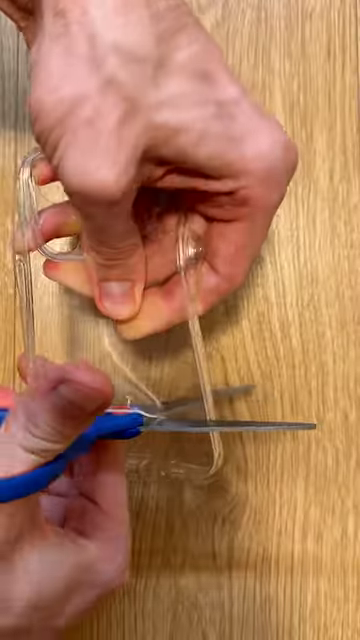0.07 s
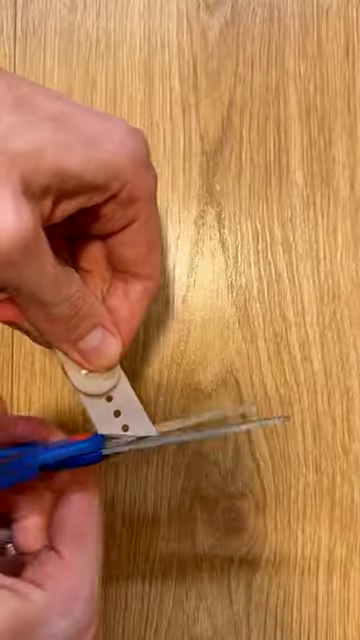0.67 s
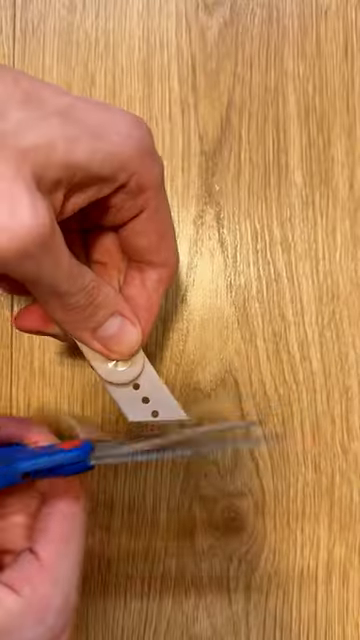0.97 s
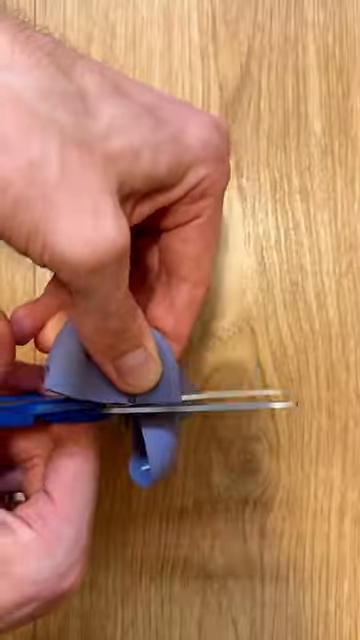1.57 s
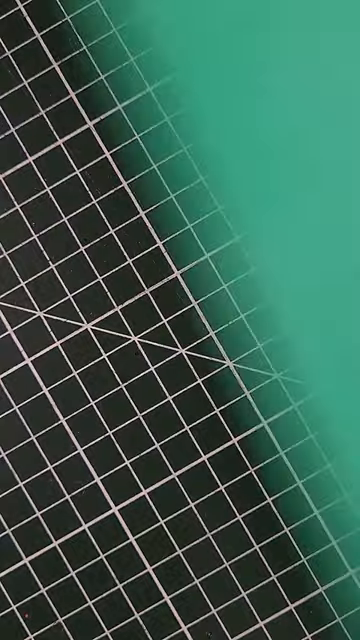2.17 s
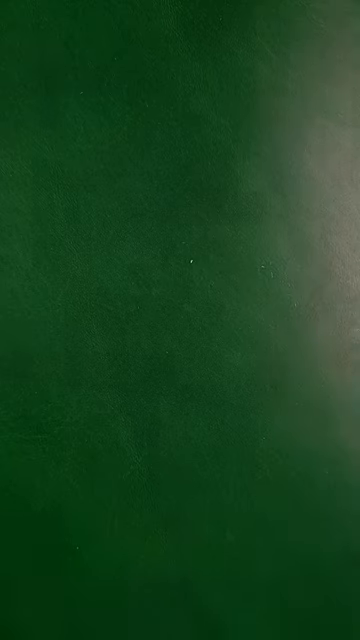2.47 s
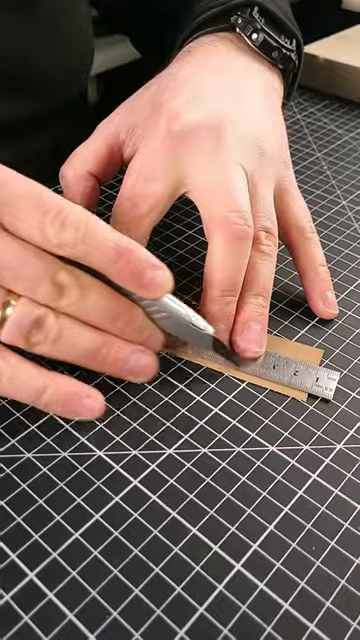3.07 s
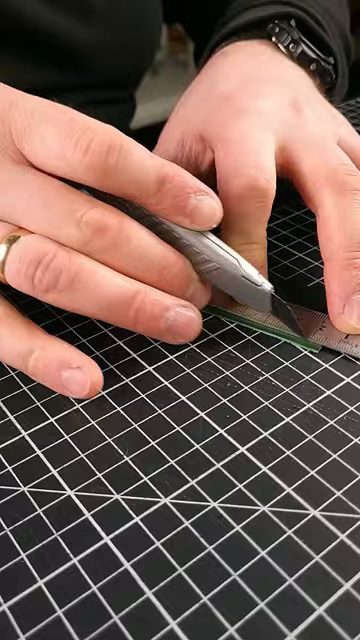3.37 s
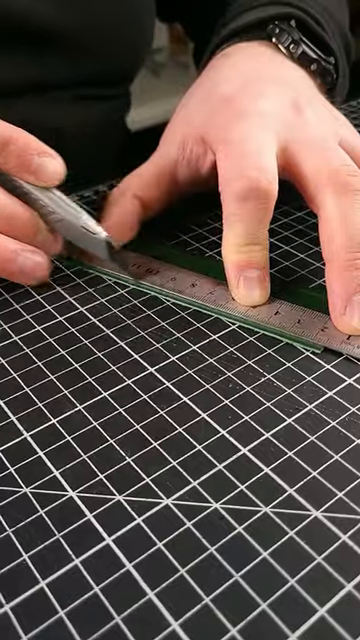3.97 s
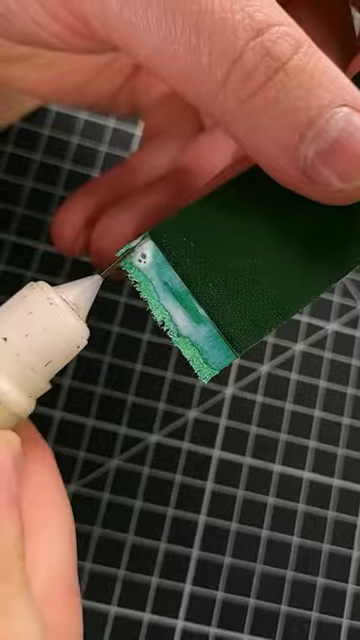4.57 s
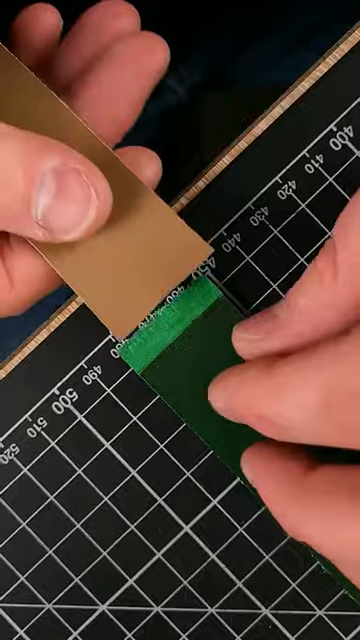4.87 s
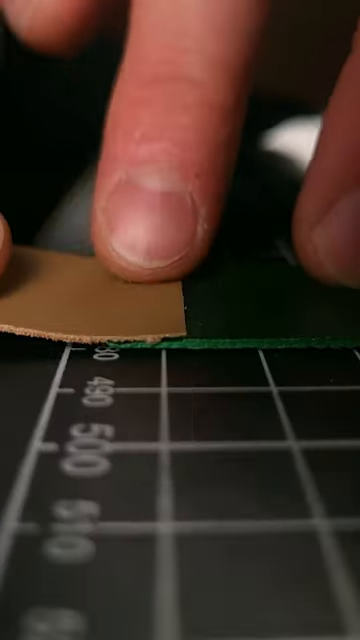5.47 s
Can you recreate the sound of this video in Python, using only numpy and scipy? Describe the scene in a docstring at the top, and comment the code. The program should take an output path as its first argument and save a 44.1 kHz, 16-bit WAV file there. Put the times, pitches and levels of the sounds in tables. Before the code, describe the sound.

A sharp crack of scissors through plastic starts a run of irregular snips, crunches and metallic ticks, heard close in a small workshop. Then comes the loudest sound, a cutting mat slapping a table, followed by lighter slaps and swishes of leather sheets. Two quieter knife strokes scrape along a steel ruler through leather, the first bright and even, the second rougher. Faint room hum and a tiny fingertip tap close it.

```python
"""Craft work heard close up. First, scissors crack through a plastic case, crunch a rubber strap and
snip a soft strip: each fracture rings the blades and jolts the handles. At 2 s a cutting mat slaps
the table, squeezing out the air beneath it, and leather sheets slide onto it. From 2.9 s a knife is
drawn twice along a steel ruler, and the parting leather fibres excite the modes of the steel.
Then only the workshop hums, with one light touch of the leather."""
import sys
import numpy as np
from scipy import signal
from scipy.fft import rfft, irfft, next_fast_len
from scipy.io import wavfile
from scipy.ndimage import uniform_filter1d, map_coordinates

SR = 44100
rng = np.random.default_rng(int(sys.argv[2]) if len(sys.argv) > 2 else 0)


def waveform_to_disk(signal):
    """Save audio, clipped to [-1, 1], as 16-bit WAV at the path in sys.argv[1]."""
    frames = np.transpose(np.atleast_2d(signal))
    scaled = np.clip(frames, -1, 1) * 32767
    samples = np.round(scaled).astype(np.int16)
    wavfile.write(sys.argv[1], SR, samples)


N = 243873
T = np.arange(N) / SR

# Levels are relative, ahead of filtering and mixing; a slope is the fall either side of a centre.
# background spectra of desk, table and workshop: (frequency [Hz], level [dB])
DESK_AIR = [(25, -13.5), (92, -9.5), (166, -22.5), (309, -27.5), (700, -37), (1500, -29.5), (2300, -26),
            (3200, -34), (4400, -26.5), (5600, -38), (7000, -32.5), (10000, -52), (16000, -61)]
TABLE_AIR = [(15, -32), (25, 7.5), (217, 1.5), (309, -5.5), (516, -9), (695, 0), (775, -4), (962, -4.5),
             (1610, -23.5), (2910, -28), (5000, -32.5), (16000, -43)]
SHOP_AIR = [(25, -7), (55, -9), (87, -16), (123, -11), (165, -16), (235, -5), (370, -8), (460, -5),
            (520, -11), (710, -3.5), (950, -12), (1120, -19), (1400, -18), (1700, -24), (2700, -28),
            (3200, -28), (4500, -37), (8000, -41), (14500, -44), (16000, -60)]
# mains hum: (frequency [Hz], level [dB])
MAINS_HUM = [(118.4, -68), (236.9, -72.5), (468.3, -74), (710.6, -69.5)]
# faint electric whines: (start [s], end [s], centre [Hz], level [dB], width [Hz])
WHINES = [(4.24, 4.75, 2317, -93, 90), (4.242, 5.2, 6830, -91, 240.3), (4.799, 5.6, 3226, -84.5, 90)]
# the workshop's level dips briefly: (time [s])
SHOP_DIPS = [4.786, 5.463]
# the hands lean on the desk: (start [s], end [s], level [dB])
LEANS = [(0.418, 0.585, -62), (0.832, 0.992, -63), (1.25, 1.456, -54.5), (1.575, 1.697, -69),
         (1.784, 2.03, -61)]
# spectrum of the desk's rumble: (frequency [Hz], level [dB])
RUMBLE_TONE = [(25, -20.5), (70, 6.0), (130, -4.5), (250, -12.5), (500, -50)]
# reverberation time: (frequency [Hz], t60 [s])
ROOM_DECAY = [(150, 0.13), (500, 0.18), (2000, 0.25), (10000, 0.1)]
# fingertip on leather: (time [s], rise [s], t60 [s], level [dB], centre [Hz], slope [dB/octave])
TOUCH = [(5.171, 0.0011, 0.019, -61, 8800, 24), (5.171, 0.0011, 0.018, -63, 2200, 8),
         (5.176, 0.012, 0.15, -70, 1910, 9)]

# resonances of desk, scissors, table, and knife with ruler: (frequency [Hz], width [Hz], level [dB])
DESK_MODES = [(245.6, 130, 4.5), (522.5, 46, -3.5), (1040, 80, 5.5)]
SCISSOR_MODES = [(1290, 180, -7), (1950, 260, 1), (2670, 220, -1), (4404, 180, -0.5), (6100, 300, -4),
                 (6950, 810, -1.5)]
TABLE_MODES = [(116, 30, -4.5), (157, 30, -12), (305, 90, -1), (438, 19, -2.5), (820, 130, -6.5),
               (1330, 81, -9), (2680, 480, -9.5), (4450, 280, -8.5)]
FIRST_MODES = [(954, 37, 14), (1655, 120, 8), (2530, 320, 0), (3460, 670, 6), (7000, 1160, 6.5),
               (9200, 900, -4), (13100, 700, -1)]
SECOND_MODES = [(318, 50, -2), (1410, 135, 6), (1880, 110, -1), (2370, 160, 3.5), (2800, 200, 1),
                (3790, 250, 4), (4410, 200, 4), (7760, 360, 4), (10100, 370, -2), (12800, 550, 0)]
# spectral envelopes of scissors, sheets and the two knife strokes: (frequency [Hz], level [dB])
SCISSOR_TONE = [(200, 6), (1000, 2.5), (3000, -5.5), (5000, -5), (8000, -4.5), (10000, -1), (12000, -7.5),
                (14500, 3.5), (16000, 0.5)]
SHEET_TONE = [(100, 1.5), (520, 0), (640, -2.5), (780, -1), (5000, -2.5), (10000, -1.5), (16000, -6.5)]
FIRST_TONE = [(59, -40), (100, -12.5), (283, -0.5), (381, -6.5), (560, 3.5), (800, -3.5), (930, -3),
              (1100, -2), (1390, -16.5), (1700, -13.5), (2420, -10.5), (4200, -13.5), (7140, -14.5),
              (15000, -17.5), (16000, -26)]
SECOND_TONE = [(59, -35), (100, 14), (124, 9), (147, -17), (181, -4.5), (350, -3), (700, -2), (950, -9),
               (1420, -12.5), (2700, -15.5), (3100, -19.5), (3650, -15.5), (4470, -17), (6020, -25.5),
               (7940, -19), (16000, -26.5)]

# the scissors sound in three spans, each stopping short: (start [s], end [s])
SCISSOR_CUTS = [(0, .622), (.79, 1.507), (1.52, 2.03)]
# the material gives way and the handles jolt: (time [s], level [dB], pitch [Hz])
JOLTS = [(.3857, -24.5, 920), (0.3879, -11.5, 517), (.560, -28, 442), (.563, -31.5, 252),
         (0.855, -29.5, 540), (0.9528, -29.5, 620), (1.008, -31.5, 620), (1.0409, -43.5, 600),
         (1.0604, -44, 570), (1.272, -43, 570), (1.3638, -21, 500), (1.4197, -27, 537), (1.464, -38, 487),
         (1.798, -44, 448), (1.851, -43.5, 445), (1.904, -44.5, 520)]
# dry ticks of the blades: (time [s], level [dB], pitch [Hz], bright edge [dB])
TICKS = [(0.1707, -37.5, 1410, -43.5), (0.607, -37.5, 1590, -38), (1.11, -32, 1640, -23),
         (1.2233, -29, 1390, -38), (1.418, -38.5, 1400, -48), (1.7575, -25, 2120, -23.5),
         (1.8117, -38, 2320, -36.5), (1.8491, -35, 2840, -34), (1.904, -51, 2320, -34),
         (1.9837, -54.5, 2700, -43), (2.01, -55, 2430, -50)]
# the material cracks: (time [s], level [dB], centre [Hz], slope [dB/octave])
CRACKS = [(0.374, -26.5, 6400, 6), (0.3765, -16, 7560, 17), (.381, -28.5, 8100, 10),
          (0.384, -27.5, 3150, 16), (0.5549, -30.5, 4570, 4), (0.607, -43, 2700, 11.5),
          (0.6122, -45, 2880, 10), (0.797, -43, 2510, 0.5), (0.852, -47.5, 1850, 27),
          (.865, -52.5, 2000, 14), (.957, -45.5, 2400, 21), (.968, -51, 2500, 17), (1.035, -59, 6500, 7.5),
          (1.222, -43, 10000, 5), (1.233, -39, 7000, -0.5), (1.2358, -34, 5900, 8),
          (1.2379, -34.5, 2800, 21.5), (1.416, -52, 1600, 6), (1.461, -45, 2300, 8.5),
          (1.757, -32, 3050, 11), (1.763, -39, 2350, 28), (1.808, -47, 2400, 25), (1.849, -43, 3970, 35),
          (1.874, -47, 2800, 11), (1.9, -47, 2580, 5)]
# the blades slide along each other: (time [s], t60 [s], level [dB], hiss [dB])
GRINDS = [(0.199, 0.17, -64, -64), (0.328, 0.22, -75, -66.5), (0.491, 0.46, -52, -56),
          (0.835, 0.15, -56, -64), (0.944, 0.18, -51, -51), (1.268, 0.082, -54, -58),
          (1.344, 0.33, -55, -56), (1.766, 0.31, -57.5, -69.5), (1.875, 0.25, -54.5, -65),
          (1.926, 0.25, -62.5, -75)]
# phase difference between two microphone ports at the desk: (frequency [Hz], phase [rad])
PORT_PHASE = [(200, 0), (800, 0.64), (2500, -1), (4500, -1.5), (7000, -0.96), (11000, -3), (14000, -3.5)]

# mat and sheets land: (time [s], clap [dB], clap pitch [Hz], clap width [cycles],
# air [dB], air centre [Hz], air t60 [s], smack [dB])
LANDINGS = [(2.0358, -16.5, 606, 0.95, -23.5, 1000, 0.094, -33.5),
            (2.0676, -7, 421.4, 1.25, -20, 1900, 0.043, -23.5), (2.131, -17, 798, 2, -23, 1100, .07, -33),
            (2.2863, -17, 800, 1.4, -20, 850, 0.051, -37),
            (2.5822, -21, 870, 2.25, -37.5, 1000, 0.077, -47.5)]
# a stiff edge whips the table: (time [s], level [dB], pitch [Hz], width [cycles])
EDGE_SNAPS = [(2.067, -4.5, 2302, 0.4), (2.1307, -12, 1902, 0.3), (2.1365, -14.5, 1700, 0.24),
              (2.2817, -2.5, 2200, 0.3)]
# the body of the sheet follows and bounces: (time [s], level [dB], pitch [Hz])
THUDS = [(2.0432, -27, 200.2), (2.0723, -3.5, 217), (2.0865, -10, 290), (2.1025, -19, 170),
         (2.115, -18, 461), (2.1378, -20, 130), (2.189, -27, 260), (2.2932, -18, 180.8),
         (2.3338, -27, 188.6), (2.5889, -29.5, 188)]
# the sheets slide: (time [s], rise [s], t60 [s], level [dB], centre [Hz])
SLIDES = [(2.07, 0.0083, 0.21, -23.5, 600), (2.112, 0.012, 0.36, -22, 804), (2.135, 0.025, 0.4, -30, 220),
          (2.215, 0.055, 0.092, -28, 1200), (2.319, 0.011, 0.26, -31.5, 550),
          (2.357, 0.024, 0.022, -42.5, 2900), (2.585, 0.021, 0.31, -40.5, 2350)]
# the smooth face of the leather hisses past: (time [s], t60 [s], level [dB], centre [Hz])
SWISHES = [(2.061, 0.12, -38.5, 5500), (2.125, 0.21, -38.5, 6990), (2.231, 0.093, -36.5, 10800),
           (2.337, 0.04, -44.5, 4490)]
# light pats on the leather: (time [s], level [dB], centre [Hz])
PATS = [(2.331, -41, 1900), (2.348, -43.5, 3000), (2.473, -41.5, 1167), (2.544, -40.5, 1396),
        (2.634, -37, 840), (2.669, -48, 1110), (2.714, -48.5, 1006)]
# the air gap under the falling sheet narrows: (time [s], resonance [Hz], lift [dB])
SHEET_GAP = [(2.03, 1290, 5.5), (2.28, 1370, 1.5), (2.39, 3280, 10), (2.7, 2500, -3)]
# stereo spread of the sheets: (frequency [Hz], side level [dB])
SHEET_WIDTH = [(60, -14), (250, -30.5), (1000, -19), (2000, -18), (5000, -25), (11000, -30.5)]

# first knife stroke: (time [s], drag on the mat [dB], ruler ring [dB], rasp [dB], hiss [dB])
FIRST_LEVELS = [(2.9, -50, -48, -45, -45.5), (2.908, -42.5, -43.5, -46, -43.5),
                (2.94, -47, -43, -44, -44.5), (2.958, -45, -45, -46.5, -46),
                (2.994, -44.5, -54, -46.5, -45.5), (3.046, -48, -41.5, -46.5, -44),
                (3.07, -48.5, -44.5, -51, -44), (3.13, -54.5, -44.5, -53.5, -44.5),
                (3.17, -47.5, -47, -50, -43.5), (3.218, -52, -51, -52, -48), (3.254, -56, -48, -46, -42),
                (3.282, -49.5, -44.5, -46, -45), (3.365, -51, -44.5, -46, -45.5)]
# second knife stroke: (time [s], drag on the mat [dB], rasp [dB], blade ring [dB], hiss [dB])
SECOND_LEVELS = [(3.39, -64, -51, -56, -52.5), (3.42, -56, -49.5, -57.5, -55), (3.48, -56, -55, -57, -54),
                 (3.492, -57, -51, -56, -55), (3.504, -62, -48.5, -57, -55.5), (3.55, -53, -45, -49, -53.5),
                 (3.58, -59, -48, -53.5, -57), (3.67, -57, -40.5, -44.5, -55),
                 (3.742, -53, -43.5, -58.5, -50), (3.768, -58, -38, -47.5, -48.5),
                 (3.876, -53, -39.5, -41, -53.5), (3.914, -55, -41, -50, -54.5),
                 (3.936, -51, -47, -47, -55), (3.95, -51.5, -44, -49, -45), (3.976, -50, -52.5, -46.5, -50),
                 (4.11, -44, -56.5, -50, -55), (4.154, -49.5, -57.5, -54.5, -56.5),
                 (4.23, -49, -60, -54, -59.5)]
# the hollow under the travelling knife hand: (time [s], resonance [Hz], lift [dB])
FIRST_HOLLOW = [(2.9, 1750, 9), (3.05, 2140, 3), (3.16, 3120, 5), (3.37, 2520, 3.5)]
SECOND_HOLLOW = [(3.39, 880, 16), (3.53, 950, 9), (3.7, 1390, 8.7), (3.8, 1760, 12), (3.9, 2080, 6.3),
                 (4.24, 2980, 1.44)]
# the edge catches on tough fibres: (time [s], level [dB], centre [Hz], t60 [s], slope [dB/octave])
CATCHES = [(2.9085, -37, 3000, 0.0093, 9), (2.97, -32.5, 13050, .012, 22), (3.073, -35, 6840, 0.02, 45),
           (3.2446, -36, 3020, 0.013, 14), (3.256, -34, 3200, 0.012, 16), (3.4234, -47, 3850, 0.024, 62),
           (3.4904, -38.5, 4020, 0.026, 58), (3.674, -43, 3850, 0.031, 60), (3.7, -40.5, 3850, 0.031, 55)]


def amp(db):
    """Amplitude ratio of a level in decibels."""
    return 10 ** (np.asarray(db) / 20)


def unit(x):
    """Normalisation to rms 1."""
    return x / np.sqrt(np.mean(x ** 2) + 1e-20)


def along(points, hz):
    """Interpolation on a logarithmic frequency axis."""
    f, v = np.transpose(points)
    return np.interp(np.log(hz + 1), np.log(f + 1), v)


def envelopes(rows):
    """Amplitude envelopes, one for each level column."""
    times, *levels = np.transpose(rows)
    return [amp(np.interp(T, times, db)) for db in levels]


def during(start, end, fade):
    """A time window that fades in and stops short."""
    return np.clip((T - start) / fade, 0, 1) * np.clip((end - T) / 0.0026, 0, 1)


def filtered(x, response):
    """Linear filtering: the spectrum times a frequency response."""
    n = x.shape[-1]
    m = next_fast_len(n + 8192)
    return irfft(rfft(x, m) * response(np.fft.rfftfreq(m, 1 / SR)), m)[..., :n]


def highpass(f, hz):
    """Magnitude response of a third-order high-pass."""
    return 1 / np.sqrt(1 + (hz / (f + 1)) ** 6)


def ringing(modes, f):
    """Modal response: direct sound plus damped resonators."""
    return 1 + sum(amp(db) * 1j * f * w / (c * c - f * f + 1j * f * w) for c, w, db in modes)


def add(track, s, sound):
    """Superposition of a sound on a track from time s."""
    part = track[max(round(s * SR), 0):][:len(sound)]
    part += sound[:len(part)]


def stereo(mid, side):
    """Sum and difference give left and right."""
    return np.array([mid + side, mid - side])


def flutter(rate, depth_db):
    """Random amplitude modulation, with rate new values a second."""
    knots = rng.standard_normal(int(N * rate / SR) + 4)
    return unit(amp(depth_db * map_coordinates(knots, [T * rate])))


def grit(n, density, spread_db):
    """Friction as shot noise: tiny slips of unequal size, density a second."""
    slips = rng.random(n) < density / SR
    return unit(slips * rng.standard_normal(n) * amp(spread_db * np.clip(rng.standard_normal(n), -2, 2)))


def impacts(rows, droop):
    """Heavily damped oscillations whose pitch sags as the contact relaxes."""
    out, t = np.zeros(N), np.arange(-SR // 20, SR // 20) / SR
    for s, db, hz, cycles in rows:
        u = np.clip(t * hz / cycles, -4, 4)  # time in pulse widths
        add(out, s + t[0], amp(db) * np.exp(-u ** 2) * np.cos(2 * np.pi * cycles * (u - droop * u ** 2)))
    return out


def bursts(rows, density, spread_db, modes=()):
    """Shot noise with one broad spectral peak, a linear rise and an exponential decay."""
    out, t = np.zeros(N), np.arange(SR // 2) / SR
    for s, rise, t60, db, hz, slope in rows:
        colour = lambda f: amp(-slope * np.hypot(np.log2((f + 1) / hz), .3))
        swell = np.minimum(t / rise, 1) * amp(-60 * np.maximum(t - rise, 0) / t60)
        burst = amp(db) * swell * unit(filtered(grit(len(t), density, spread_db), colour))
        if modes:  # the ring shifts with the point where the blades touch
            shifted = [(c * 2 ** (0.099 * rng.standard_normal()), w, level) for c, w, level in modes]
            burst = filtered(burst, lambda f: ringing(shifted, f))
        add(out, s, burst)
    return out


def room(x, delay):
    """Reverberation: a diffuse tail in which each frequency decays at its own rate."""
    hz, t, z = signal.stft(rng.standard_normal(SR // 2), SR, nperseg=256)
    tail = signal.istft(z * amp(-60 * t / along(ROOM_DECAY, hz)[:, None]), SR, nperseg=256)[1]
    return signal.fftconvolve(x, np.pad(tail / np.linalg.norm(tail), (round(delay * SR), 0)))[:N]


def cavity(x, hollow, octaves, ripple_db):
    """A gliding cavity resonance, rippled by reflections off the moving hands; loudness is kept."""
    hz, t, z = signal.stft(x, SR, nperseg=512)
    s, centre, lift = np.transpose(hollow)
    detuning = np.log2((hz[:, None] + 1) / np.interp(t, s, centre)) / octaves
    ripples = uniform_filter1d(rng.standard_normal(z.shape), size=3, axis=0)
    ripples = unit(uniform_filter1d(ripples, size=28, axis=1))
    gain = amp(np.interp(t, s, lift) * np.exp(-detuning ** 2) + ripple_db * ripples)
    power = np.mean(np.abs(z) ** 2, axis=1)
    return signal.istft(z * gain / np.sqrt(power @ gain ** 2 / power.sum()), SR, nperseg=512)[1][:N]


def air(spectrum, side_db):
    """Coloured noise, partly correlated between the ears."""
    mid, side = filtered(rng.standard_normal((2, N)), lambda hz: amp(along(spectrum, hz)))
    return stereo(unit(mid), amp(side_db) * unit(side))


def hum(hz, db):
    """One partial of the mains hum: a sinusoid of wavering amplitude."""
    partial = amp(db) * np.sqrt(2) * np.sin(2 * np.pi * (hz * T + rng.random()))
    return partial * flutter(rate=11, depth_db=2.5)


def whine(hz, db, width_hz):
    """Narrow-band noise, heard as a fuzzy pitch."""
    return amp(db) * unit(filtered(rng.standard_normal(N), lambda f: np.exp(-((f - hz) / width_hz) ** 2)))


def desk_rumble():
    """Structure-borne noise that swells while the hands lean on the desk."""
    rest_db, fade_s = -76, 0.053
    lean = sum(amp(db) * np.exp(-((T - np.clip(T, start, end)) / fade_s) ** 2) for start, end, db in LEANS)
    return (amp(rest_db) + lean) * air(RUMBLE_TONE, side_db=-18.5)


def background():
    """The noise floor of desk, table and humming workshop in turn."""
    desk = (amp(-73) * air(DESK_AIR, side_db=-6.5) + desk_rumble()) * during(-.01, 2.03, fade=.005)
    table = amp(-43.5) * air(TABLE_AIR, side_db=-26.5) * during(2.03, 2.884, fade=0.0092)
    shop = amp(-61.5) * air(SHOP_AIR, side_db=-22) + sum(hum(hz, db - 1.5) for hz, db in MAINS_HUM)
    for start, end, hz, db, width in WHINES:
        shop += whine(hz, db, width) * during(start, end, fade=0.0071)
    dips = amp(-11 * sum(np.exp(-((T - s) / 0.0093) ** 2) for s in SHOP_DIPS))
    return desk + table + shop * dips * during(2.6, 5.6, fade=.01)


def touch():
    """Light contact: a fingertip sets the leather down with a click and a rustle."""
    return bursts(TOUCH, density=11000, spread_db=10)


def handle_jolts():
    """Sudden unloading: as the material parts, the handles thud and rebound into desk and room."""
    thuds, tails = np.zeros(N), np.zeros(N)
    for s, db, hz in JOLTS:
        rebound = (s + .004, db - 14, hz * 0.58, 1)
        jolt = impacts([(s, db, hz, 1), rebound], droop=0.17)
        thuds += jolt
        tails += room(jolt, delay=0.0062)
    return thuds + amp(-10) * filtered(tails, lambda f: ringing(DESK_MODES, f))


def blade_ticks():
    """Impact of steel on steel excites the modes of the scissors."""
    blows = []
    for s, db, hz, edge_db in TICKS:
        blows += [(s, db, hz, 0.65),  # dry body
                  (s, edge_db, 7000, 0.29),  # bright edge
                  (s, edge_db - 10.5, 3920, 5.1)]  # brief ring
    ticks = impacts(blows, droop=0.15)
    return amp(-2.5) * filtered(ticks, lambda f: ringing(SCISSOR_MODES, f) * highpass(f, 210))


def blade_crunch():
    """Fracture of the material and sliding friction of the blades ring the steel."""
    crack_rise_s, crack_t60_s = 0.0015, 0.018
    cracks, grinds, hisses, crumbs = [], [], [], []
    for s, db, hz, slope in CRACKS:
        cracks.append((s, crack_rise_s, crack_t60_s, db, hz, slope))
        cracks.append((s, crack_rise_s, crack_t60_s, db - 7.5, 14050, 16))  # finest splinters
        grinds.append((s, .006, 0.18, db - 23, 3010, 2.5))  # the blades grind on
    for s, t60, db, hiss_db in GRINDS:
        rise = 0.047 * t60
        grinds.append((s, rise, t60, db, 2004, 3))
        hisses.append((s, rise, t60, hiss_db, 8320, 14))  # the honed edges slip
        crumbs.append((s, rise, t60, db - 4.5, 2212, 16))  # the material crumbles in grains
    crunch = bursts(cracks, density=7500, spread_db=1, modes=SCISSOR_MODES)
    crunch += bursts(crumbs, density=190, spread_db=4, modes=SCISSOR_MODES)
    grinding = bursts(grinds, density=2500, spread_db=1, modes=SCISSOR_MODES)
    crunch += amp(-1) * grinding * flutter(rate=250, depth_db=2.5)
    crunch += bursts(hisses, density=700, spread_db=2.5)
    return filtered(crunch, lambda f: amp(along(SCISSOR_TONE, f)) * highpass(f, 520))


def scissors():
    """A near source: blades and handles reach the two channels with a phase difference."""
    thuds, crunch = handle_jolts(), blade_crunch()
    mid = crunch + blade_ticks() + amp(-12) * room(crunch, delay=0.0029)
    pair = stereo(mid, amp(-14) * room(crunch, delay=0.0018)) + thuds * amp([[.7], [-.7]])
    pair *= sum(during(start, end, fade=0.011) for start, end in SCISSOR_CUTS)
    sides = np.array([[1], [-1]])
    return filtered(pair, lambda f: highpass(f, 130) * np.exp(.5j * along(PORT_PHASE, f) * sides))


def landings():
    """Impact and air displacement of the falling mat and sheets; returns (blows, puffs)."""
    blows = EDGE_SNAPS + [(s, db, hz, .6) for s, db, hz in THUDS]
    puffs = []
    for s, clap_db, clap_hz, cycles, air_db, air_hz, air_t60, smack_db in LANDINGS:
        blows.append((s, clap_db, clap_hz, cycles))
        puffs.append((s - .005, .005, air_t60, air_db, air_hz, 9))  # air escapes just before contact
        puffs.append((s - .003, .003, 0.019, smack_db, 6000, 7))  # bright smack
    return impacts(blows, droop=0.12), bursts(puffs, density=10000, spread_db=-0.5)


def sheets():
    """Forced vibration of the table as mat and leather slap, slide and settle."""
    slaps, puffs = landings()
    rubs = [(s, rise, t60, db, hz, 9) for s, rise, t60, db, hz in SLIDES]
    rubs += [(s, 0.037, t60, db, hz, 14) for s, t60, db, hz in SWISHES]
    rubs += [(s, 0.0029, 0.078, db, hz, 7) for s, db, hz in PATS]
    friction = bursts(rubs, density=10000, spread_db=1.5)
    slides = cavity(puffs + friction, SHEET_GAP, octaves=0.47, ripple_db=2.5)
    table = filtered(slaps + slides, lambda f: ringing(TABLE_MODES, f) * amp(along(SHEET_TONE, f)))
    side = filtered(room(table, delay=.001), lambda f: amp(along(SHEET_WIDTH, f)))
    return stereo(table + amp(-14) * room(table, delay=.004), side)


def fibre_snaps():
    """Fracture transients: tough fibres snap under the knife."""
    snaps = [(s, .0006, t60, db, hz, slope) for s, db, hz, t60, slope in CATCHES]
    return bursts(snaps, density=20000, spread_db=1)


def scrape(tone, modes, lo_hz, hi_hz, density, spread_db):
    """Source and filter: parting fibres excite blade and ruler; one band of that, at rms 1."""
    band = lambda f: 1 / np.sqrt((1 + (lo_hz / (f + 1)) ** 8) * (1 + (f / hi_hz) ** 8))
    fibres = grit(N, density, spread_db)
    return unit(filtered(fibres, lambda f: amp(along(tone, f)) * ringing(modes, f) * band(f)))


def first_stroke():
    """Steady friction: a bright, even cut through thin leather; the ruler rings under the blade."""
    drag_gain, ring_gain, rasp_gain, hiss_gain = envelopes(FIRST_LEVELS)
    steel = FIRST_TONE, FIRST_MODES
    rasp = rasp_gain * scrape(*steel, 1430, 4400, density=3500, spread_db=2)
    hiss = hiss_gain * scrape(*steel, 5100, 18000, density=11000, spread_db=1)
    cut = amp(0.5) * cavity(rasp + hiss, FIRST_HOLLOW, octaves=0.28, ripple_db=3)
    cut += amp(1) * ring_gain * scrape(*steel, 910, 1200, density=5000, spread_db=0.5)
    cut += drag_gain * scrape(*steel, 140, 750, density=3000, spread_db=1)
    cut *= during(2.885, 3.372, fade=0.017)
    return stereo(cut, amp(-30) * room(cut, delay=.001))


def second_stroke():
    """Stick-slip friction: a longer cut under a rising resonance; the tip ends dragging on the mat."""
    drag_gain, rasp_gain, ring_gain, hiss_gain = envelopes(SECOND_LEVELS)
    steel = SECOND_TONE, SECOND_MODES
    rasp = rasp_gain * scrape(*steel, 910, 2730, density=2500, spread_db=2)
    hiss = hiss_gain * scrape(*steel, 5600, 15500, density=13000, spread_db=4)
    ring = ring_gain * scrape(*steel, 3350, 4470, density=5000, spread_db=5.5)
    cut = ring * flutter(rate=79, depth_db=0.5)
    cut += amp(0.5) * cavity(rasp, SECOND_HOLLOW, octaves=0.54, ripple_db=4)
    cut += cavity(hiss * flutter(rate=110, depth_db=1), SECOND_HOLLOW, octaves=0.49, ripple_db=4.5)
    cut += drag_gain * scrape(*steel, 178, 660, density=3300, spread_db=4.5)
    cut *= during(3.374, 4.24, fade=0.015)
    return stereo(cut, amp(-19) * room(cut, delay=.001))


def scene():
    """Superposition of all the sources."""
    return scissors() + sheets() + first_stroke() + second_stroke() + fibre_snaps() + touch() + background()


def record(dry):
    """Soft saturation rounds the loudest slap; a steep low-pass limits the band."""
    ceiling, top_hz = .78, 16300
    rounded = dry / (1 + np.abs(dry / ceiling) ** 6) ** (1 / 6)
    return filtered(rounded, lambda hz: 1 / (1 + (hz / top_hz) ** 90))


dry = scene()
out = record(dry)
waveform_to_disk(out)
```